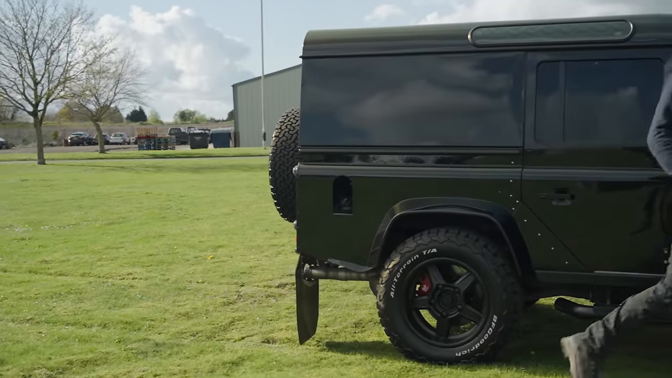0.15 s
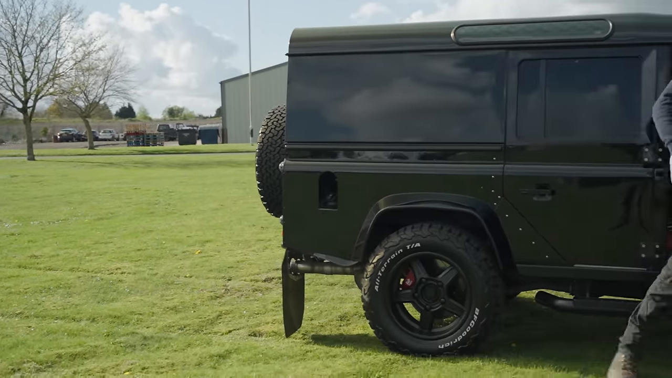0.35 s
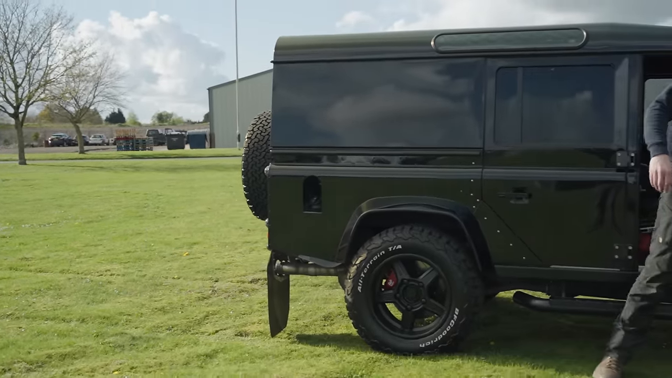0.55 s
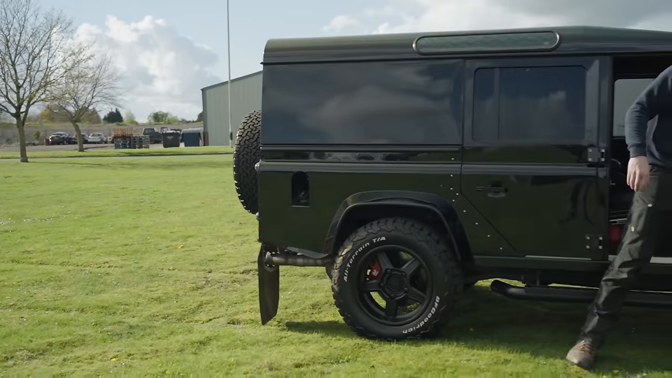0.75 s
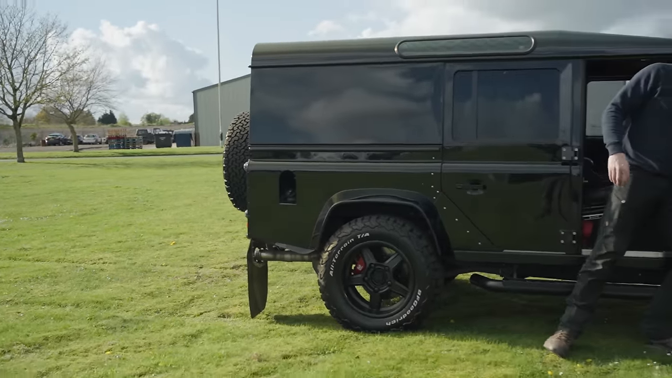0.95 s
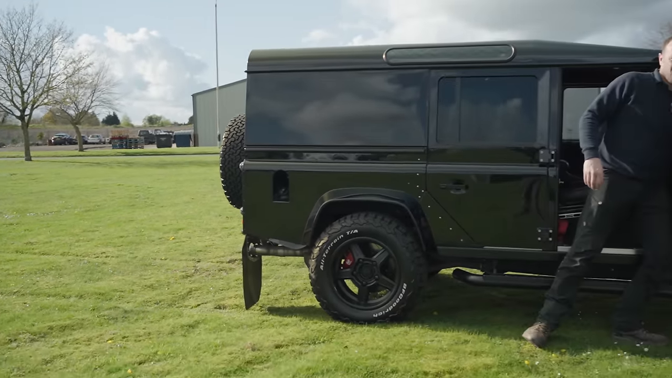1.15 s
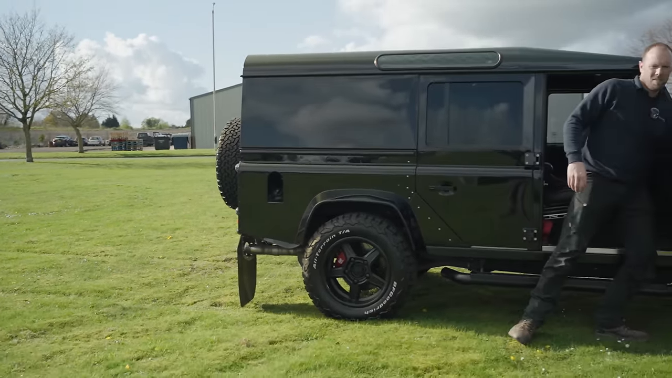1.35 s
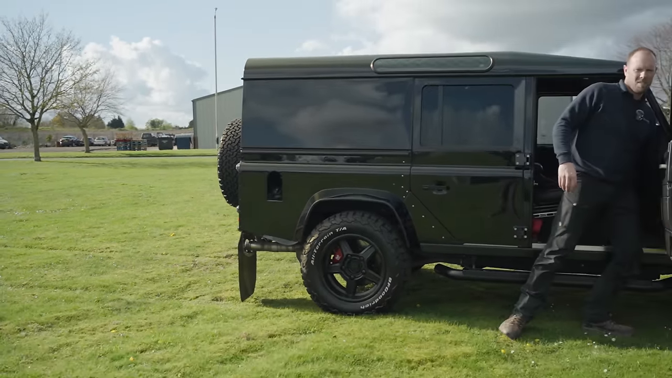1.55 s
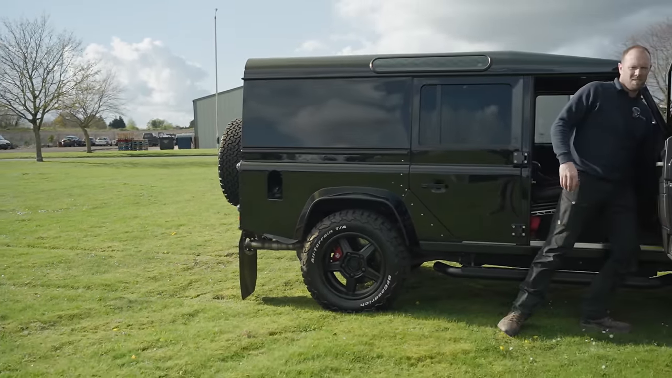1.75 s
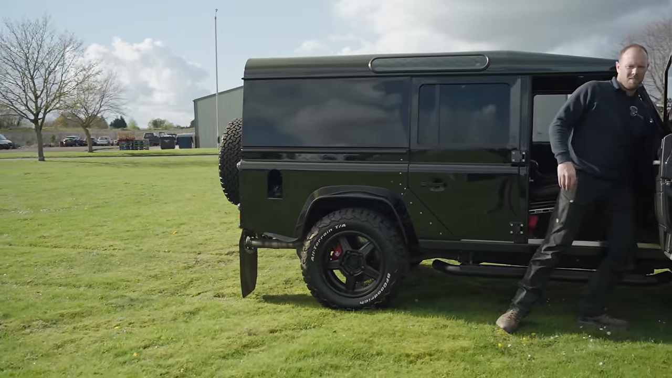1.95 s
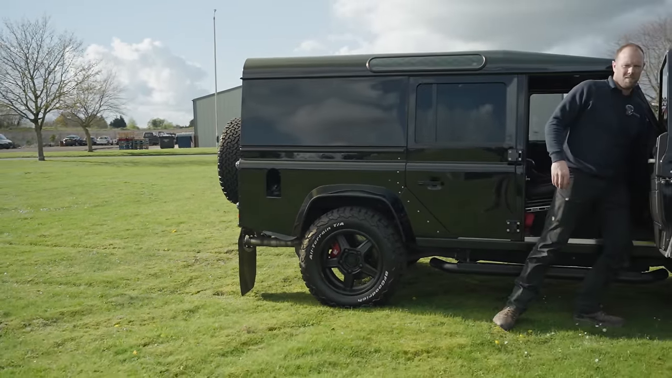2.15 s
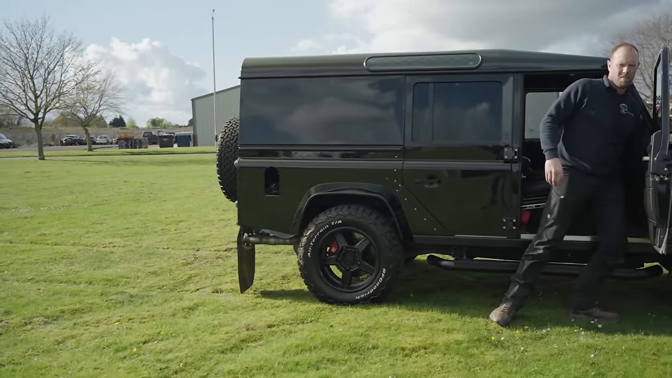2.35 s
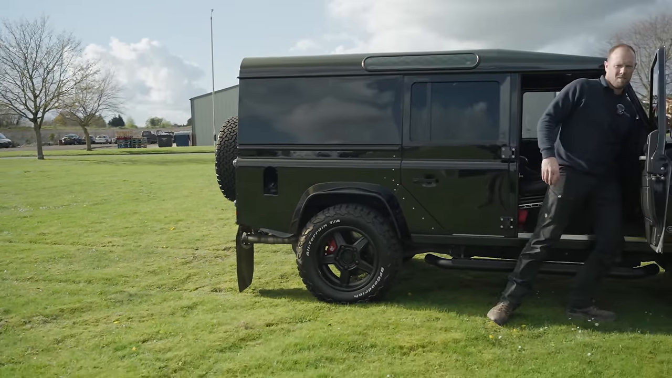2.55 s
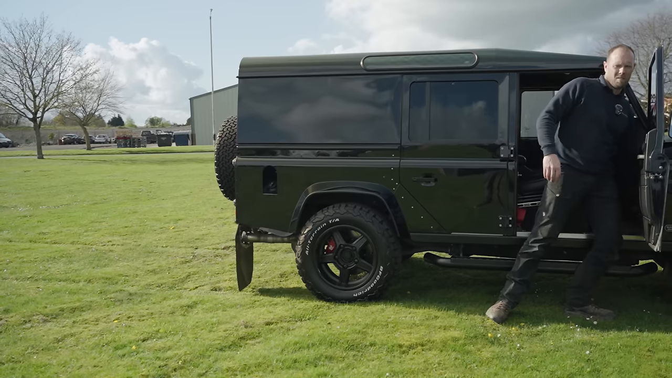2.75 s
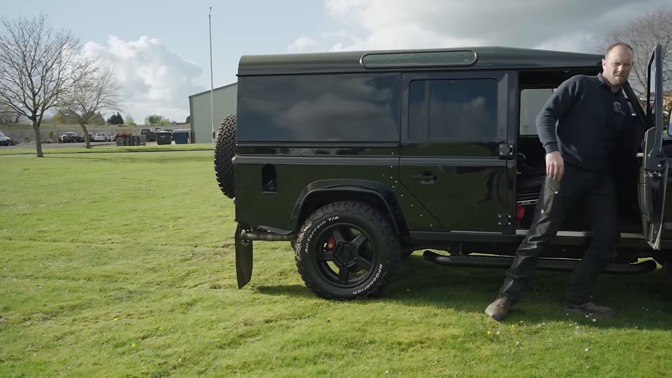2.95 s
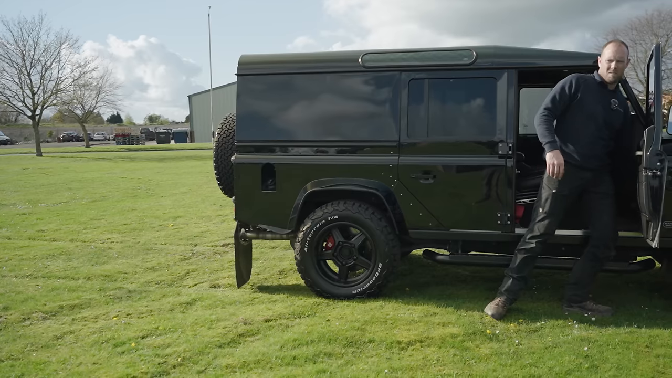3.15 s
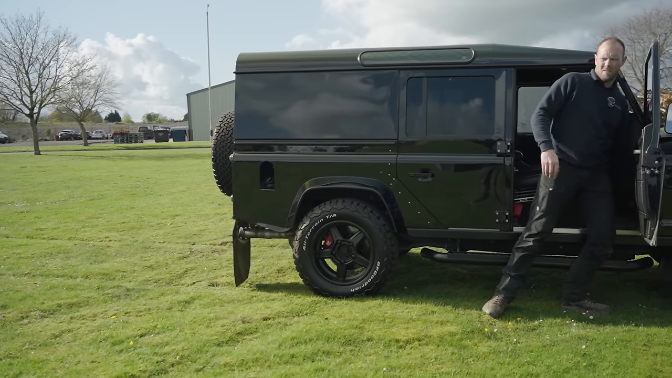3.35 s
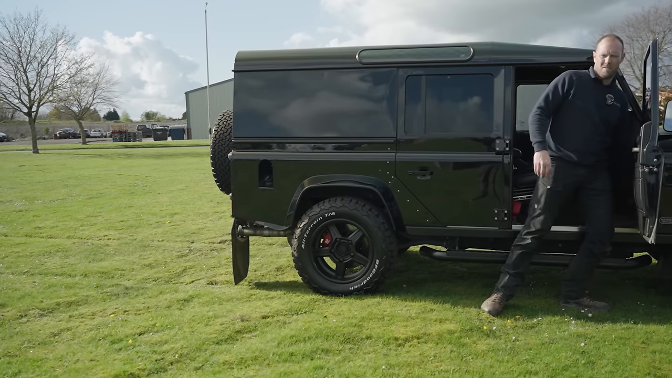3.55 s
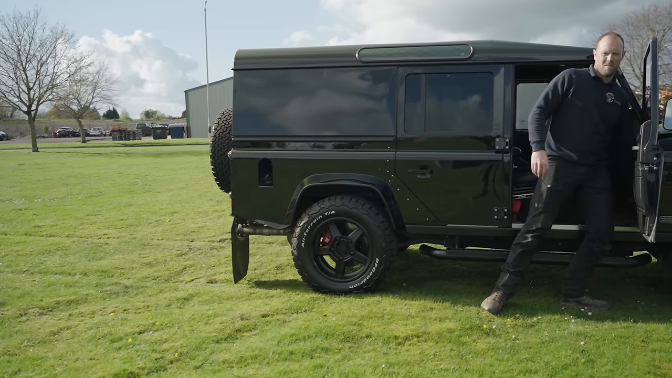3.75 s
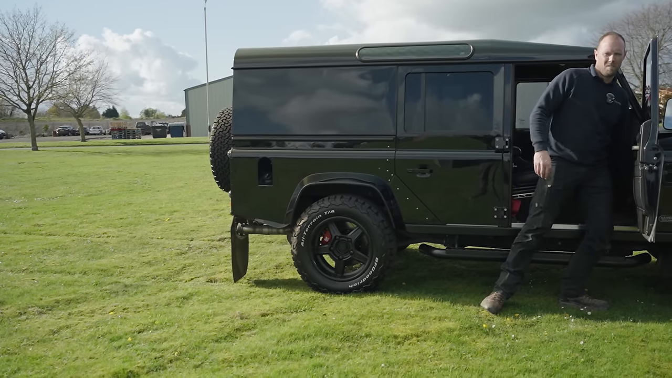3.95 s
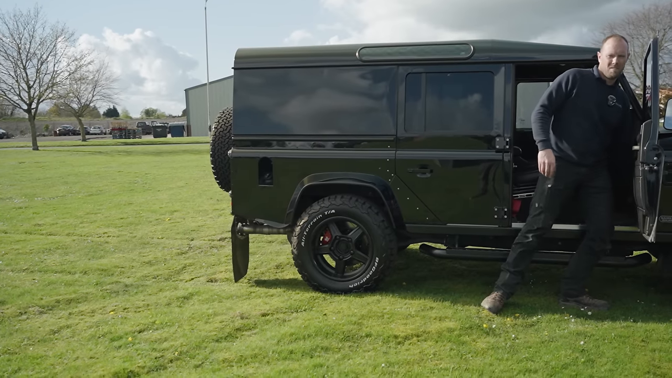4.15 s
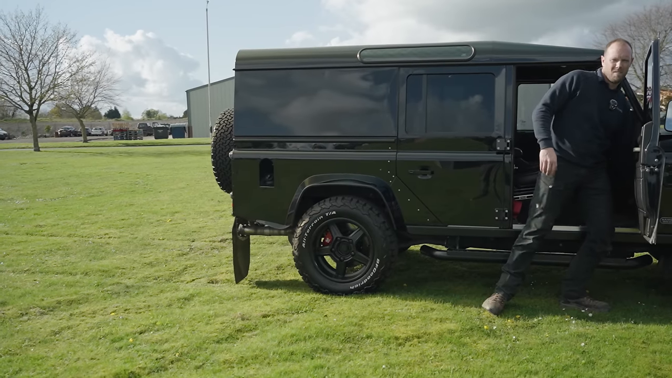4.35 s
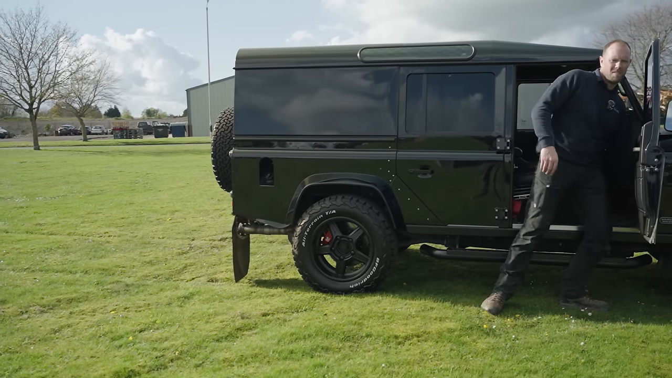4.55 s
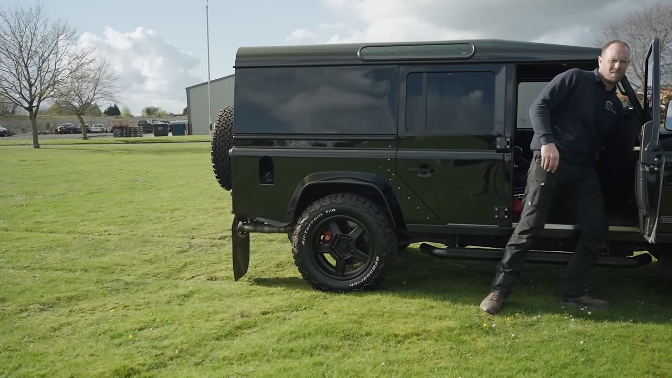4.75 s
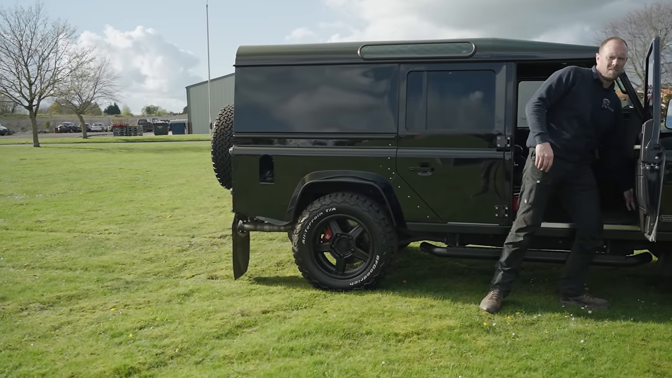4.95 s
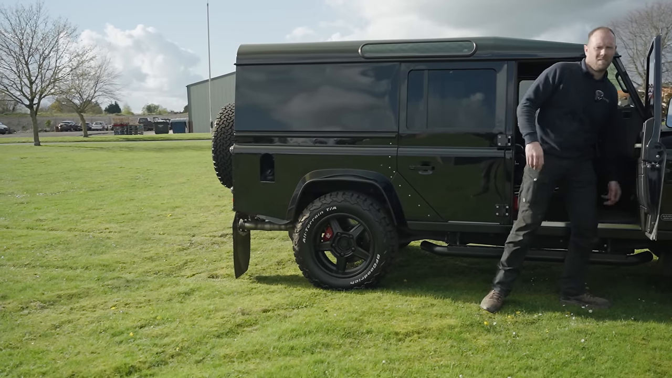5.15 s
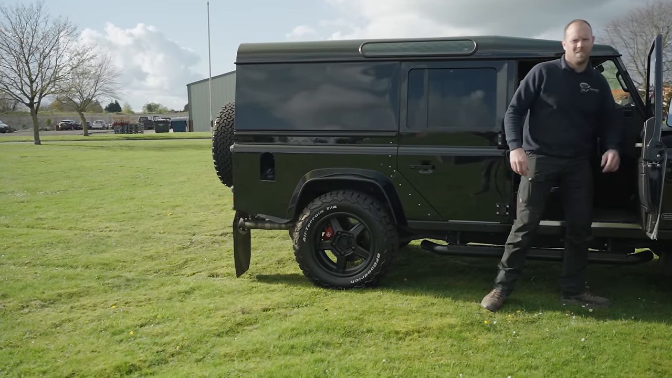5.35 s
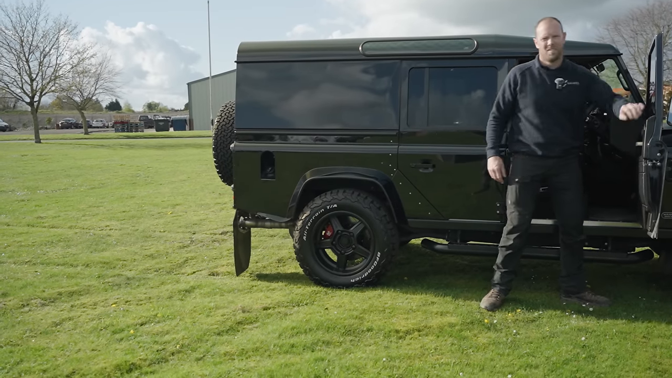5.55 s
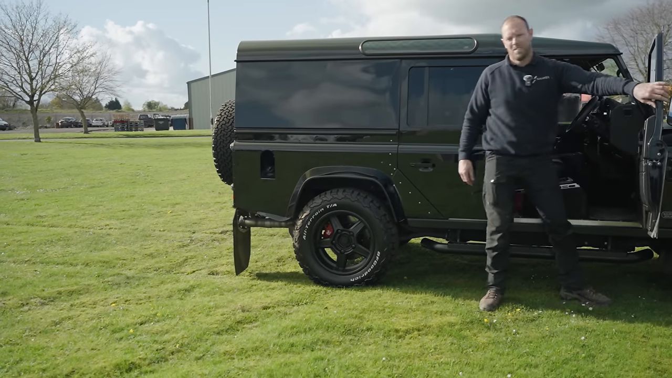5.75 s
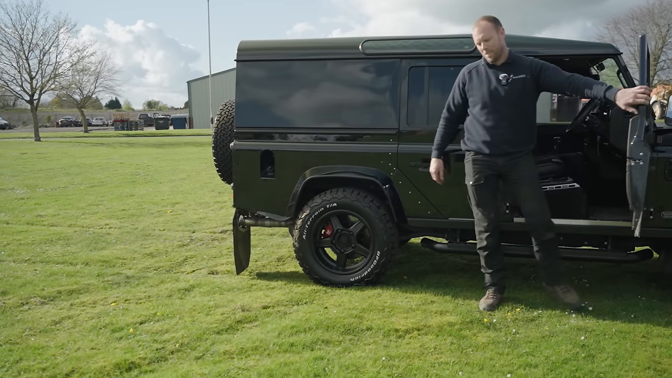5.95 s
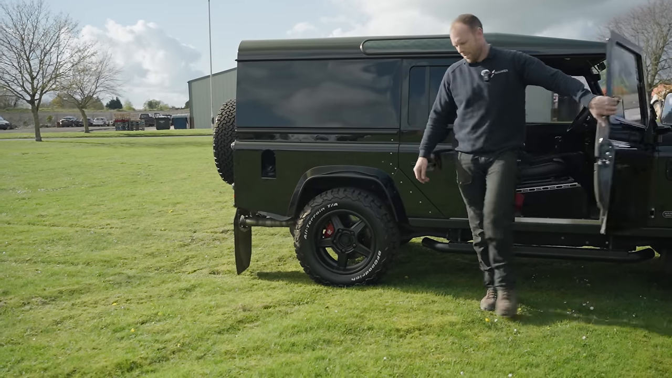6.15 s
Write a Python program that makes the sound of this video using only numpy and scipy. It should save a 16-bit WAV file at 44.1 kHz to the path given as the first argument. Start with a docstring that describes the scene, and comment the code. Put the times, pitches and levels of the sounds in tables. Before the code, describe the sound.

A big V8 idles with a lumpy lope on a lawn, then is revved three times, each harder, the last distorting and crackling.

```python
"""On a lawn a big V8 off-roader idles with a lope and is revved three times, each time harder. Uneven firing
pulses excite the standing waves of the exhaust, and engine orders sweep through them. Pulsed noise makes the
intake and gas jet hiss; a wave repeated each cycle makes the valve gear whirr. Struck resonances burble on the
overrun and sharp cracks ring out at the loudest peaks; a faint duct tone, ticks and air lie beneath, and the
last rev overloads the microphone, which clips the loudest peaks."""
import sys
import numpy as np
from scipy import signal
from scipy.fft import rfft, irfft, next_fast_len
from scipy.io import wavfile
from scipy.ndimage import uniform_filter1d

SR = 44100
rng = np.random.default_rng(int(sys.argv[2]) if len(sys.argv) > 2 else 0)


def digitize_waveform(pressure):
    """Quantize a signal to 16-bit integers and store it at the path in sys.argv[1].

    Rows of a 2-D input are taken as channels; values are limited to [-1, 1].
    """
    field = np.atleast_2d(pressure).T
    bounded = np.clip(field, -1, 1)
    quanta = np.round(bounded * 32767).astype(np.int16)
    wavfile.write(sys.argv[1], SR, quanta)


N = 273800
TIME_S = np.arange(N) / SR

# Leading engine orders, in multiples of the four-stroke cycle rate: 8 is the firing rate,
# and the uneven banks add most others.
LEADING_ORDERS = (2, 3, 4, 5, 6, 7, 8, 9, 10, 11, 13, 16)
# Cylinders in firing order. Each entry: pulse strength in dB.
CYLINDERS = [-5.5, 0.5, -1, -3.5, -3, -3, -18, -1]
# Silencer and tailpipe modes. Each row: frequency in Hz, width in Hz, gain in dB.
BARK_MODES = [(340, 100, -2.5), (431.6, 25.4, 9.5), (496.7, 38.8, 7.5), (545.5, 50.7, 5.5), (582, 21, 6),
              (635, 88, 0), (754.5, 49, -9), (744, 33, -10.5), (1130, 220, -20)]


def from_db(db):
    """Amplitude gain from a level: 20 dB is a factor of ten."""
    return 10 ** (np.asarray(db) / 20)


def rms_one(x):
    """Normalise the mean power to 1."""
    return x / np.sqrt(np.mean(x ** 2) + 1e-20)


def drift(rate):
    """Slow random modulation: normal values of spread 1, rate per second, joined by straight lines."""
    return np.interp(TIME_S * min(rate, 300), np.arange(2048), rng.standard_normal(2048))


def evened(x, span):
    """Automatic gain: hold the rms near 1 over about span seconds, while faster throbs stay."""
    size = max(int(span * SR), 8)
    power = uniform_filter1d(uniform_filter1d(x * x, size), size)
    return x / np.sqrt(np.maximum(power, 1e-20))


def cut(x, hz, kind, order):
    """Butterworth low- or high-pass: maximally flat passband."""
    return signal.sosfilt(signal.butter(order, min(hz, .45 * SR), kind, fs=SR, output="sos"), x)


def coloured(x, spectrum):
    """Spectral shaping: weight a sound by a smooth curve of Hz and dB, then set its rms to 1."""
    hz, db = np.transpose(spectrum)
    size = next_fast_len(N + SR // 2)
    bins = np.maximum(np.arange(size // 2 + 1) * SR / size, 1)
    skirt = np.minimum(bins / hz[0], 1) ** 4   # falls away below the first frequency
    weight = skirt * from_db(np.interp(np.log(bins), np.log(hz), db))
    return rms_one(irfft(rfft(x, size) * weight, size)[:N])


def resonate(x, modes):
    """Modal sum: parallel two-pole resonances of alternating sign, as along a pipe."""
    out = 0
    for k, (hz, width, db) in enumerate(modes):
        r = np.exp(-np.pi * width / SR)
        poles = [1, -2 * r * np.cos(2 * np.pi * hz / SR), r * r]
        gain = (-1) ** k * from_db(db) * (1 - r * r) / 2
        out = out + gain * signal.lfilter([1, 0, -1], poles, x + 1e-18)
    return out


def each_cycle(orders, turn, size=8192):
    """Fourier synthesis: repeat the wave with these complex orders once per engine cycle."""
    return np.interp(turn % 1 * size, np.arange(size), irfft(orders, size)) * size


def load(lead_s=0):
    """Throttle load: each blip ramps up linearly, is held and dies away exponentially."""
    # Each row: opening in seconds, time to the start of decay in seconds, load from 0 to 1,
    # attack in seconds, release time constant in seconds.
    blips = [(1.38, .31, .74, .22, .17), (2.6, .48, .87, .36, .1), (4.5, .51, 1, .31, .06)]
    t = TIME_S + lead_s
    return sum(depth * np.clip((t - s) / attack, 0, 1) * np.exp(-np.maximum(t - s - held, 0) / release)
               for s, held, depth, attack, release in blips)


def swells(rows):
    """Level modulation: Gaussian bumps in dB, one curve for each level column."""
    return sum(np.outer(db, np.exp(-((TIME_S - s) / width) ** 2)) for s, width, *db in rows)


def at_speed(rate):
    """Speed dependence: coasting levels in dB, interpolated along the logarithm of engine speed."""
    # Levels with the throttle shut. Each row: speed in cycles per second, then boom, bark,
    # valve whirr, intake hiss and gas jet, each in dB.
    coasting = [(5.95, -38, -75, -81, -80, -84.5), (13.5, -38.5, -57, -70.5, -78.5, -87),
                (28.2, -32.5, -42.5, -57, -66.5, -75), (36.4, -33, -42, -53, -66, -74.5),
                (41.36, -43.5, -33, -48.5, -60.5, -69.5), (46.8, -30.5, -34.5, -44.5, -56.5, -63)]
    rates, *columns = np.transpose(coasting)
    return [np.interp(np.log(rate), np.log(rates), c) for c in columns]


def scatter(turn):
    """Cyclic variation of combustion: a random surplus or lack at each firing."""
    fired = np.diff(np.floor(turn * len(CYLINDERS)), prepend=0) > 0
    return fired * rng.standard_normal(N)


def puffs(turn, depth):
    """Pulsed turbulence: noise whose level swings by depth dB either way with every firing."""
    return rng.standard_normal(N) * from_db(depth * np.cos(2 * np.pi * len(CYLINDERS) * turn))


def background_air():
    """Steady broadband noise, strongest in the bass."""
    # Noise spectrum. Each row: frequency in Hz, relative level in dB.
    air_colour = [(50, 2), (150, -4), (500, -5), (1000, -19.5), (3000, -42), (8000, -48), (16000, -57.5)]
    return from_db(-57.5) * coloured(rng.standard_normal(N), air_colour)


def ticks():
    """Noise bursts with exponential decay: short dry rustles that die at once."""
    # Footfalls and clothing ticks beside the door. Each row: start in seconds, level in dB
    # before the common cut, time to decay by 60 dB in seconds, high-pass frequency in Hz.
    rustles = [(0.232, -44, 0.015, 4600), (.405, -51.5, 0.14, 3200), (0.507, -47, 0.04, 3300),
               (0.902, -47, 0.046, 810)]
    # Rustle spectrum. Each row: frequency in Hz, relative level in dB.
    tick_colour = [(400, 6), (1300, 23), (2800, 21), (4200, 13), (7000, 5), (14000, -20)]
    out = np.zeros(N)
    noise = coloured(rng.standard_normal(N), tick_colour)
    for s, db, t60, low_hz in rustles:
        decay_db = 60 * np.clip((TIME_S - s) / t60, 0, 2)
        out += (TIME_S >= s) * from_db(db - decay_db) * cut(noise, low_hz, "high", order=3)
    return from_db(-10.5) * out


def howl(rate):
    """Flow-excited resonance: moving air sings faintly in one fixed duct mode, louder with speed."""
    song = resonate(rng.standard_normal(N), [(822.4, 16, 0)])   # Hz, width Hz, dB
    song = cut(cut(song, 700, "high", order=3), 950, "low", order=3)
    return from_db(np.interp(rate, [6, 13, 30, 50], [-72.0, -65.0, -54.0, -50.5])) * rms_one(song)


def whines(turn, rate):
    """Order-locked overtones of the running gear surface and sink at random as the revs fall."""
    # Each row: multiple of the cycle rate, level against the whirr in dB before a 2 dB cut.
    overtones = [(24, -16), (25, -17), (32, -20), (36, -15), (48, -14), (56, -18), (72, -15), (76, -19)]
    tones = 0
    for k, db in overtones:
        level_db = db - 2 + 6 * np.minimum(drift(14), 1) + 2 * drift(60)
        phase = k * turn + rng.random() + .08 * drift(50)   # in turns, slightly unsteady
        tones = tones + from_db(level_db) * np.sin(2 * np.pi * phase)
    fast = np.interp(rate, [22, 44], [0, 1])   # lost at low speed
    return np.sqrt(2) * fast * np.clip(1 - load(), 0, 1) * tones


def engine_bay(turn, rate, count=380):
    """Periodic impacts and pulsed flow noise: valve gear whirrs, intake and gas jet hiss in puffs."""
    # Spectra of the whirr, intake hiss and gas jet. Each row: frequency in Hz, relative level in dB.
    whirr_colour = [(800, 3.5), (1000, -6), (1200, -2), (1600, -4.5), (2000, -7), (2800, -10.5),
                    (3700, -10), (4400, -21), (8000, -34.5), (16000, -53)]
    intake_colour = [(1500, -33.5), (2050, -12.5), (2280, -3.5), (2500, -2.5), (2900, 0), (3150, -4),
                     (3500, -9.5), (4500, -36.5)]
    jet_colour = [(2500, -25.5), (4200, 0), (6500, -0.5), (9000, -10.5), (12000, -27), (16000, -22)]
    # The intake hiss swells (+) and slackens (-) during the blips.
    # Each row: centre in seconds, half width in seconds, level change in dB.
    gulps = [(1.43, 0.046, -1.5), (1.61, 0.028, 2.5), (1.72, 0.098, -6), (2.72, 0.074, -2),
             (2.905, 0.057, 8), (2.97, 0.034, -6.5), (3.055, 0.02, 5.5), (4.55, .04, 3.5), (4.67, 0.078, 3),
             (4.97, 0.047, 1)]
    whirr_load_db, intake_load_db, jet_load_db = 8.5, 19.5, 14.5   # added by full load
    intake_load = load(lead_s=0.055)   # the intake draws air before the exhaust answers

    whirr_db, intake_db, jet_db = at_speed(rate)[2:]
    whirr_db = whirr_db + whirr_load_db * load() * rate / rate.max()   # load times speed
    intake_db = intake_db + intake_load_db * intake_load + swells(gulps)[0]
    jet_db = jet_db + jet_load_db * load()

    strengths = from_db(6 * np.clip(rng.standard_normal(count), -2, 2))
    valves = each_cycle(strengths * np.exp(2j * np.pi * rng.random(count)), turn)
    noise = coloured(rng.standard_normal(N), whirr_colour)
    whirr = .62 * coloured(valves, whirr_colour) + .8 * noise

    depth_db = np.interp(rate, [6, 25], [.6, 2.5])   # the flow is smooth at idle
    intake_flutter = from_db(2 * np.clip(intake_load, 0, 1) * drift(200))
    intake = coloured(puffs(turn, depth_db), intake_colour) * intake_flutter
    jet = coloured(puffs(turn, depth_db), jet_colour) * from_db(0.53 * drift(51))
    return (from_db(whirr_db) * (whirr + whines(turn, rate))
            + from_db(intake_db) * intake + from_db(jet_db) * jet)


def burbles():
    """Impulse response of the pipe: unburnt fuel goes off, barks, and the main standing wave rings."""
    # Each row: start in seconds, peak level in dB.
    bursts = [(3.364, -14.5), (3.378, -15.5), (5.131, -4), (5.148, -5), (5.266, -24), (5.700, -29),
              (6.126, -26)]
    kick = signal.unit_impulse(SR)
    pop = resonate(kick, BARK_MODES) + resonate(kick, [(141.0, 2.27, 28.5)])   # Hz, width Hz, dB
    pop = cut(cut(pop, 760, "low", order=5), 96, "high", order=4)
    pop = pop / np.abs(pop).max()
    out = np.zeros(N)
    for s, db in bursts:
        at = int(s * SR)
        out[at:at + len(pop)] += (from_db(db) * pop)[:N - at]
    return out


def cracks(turn, rate):
    """Steep pressure pulses ring very briefly; near top speed under load every firing adds a rasp."""
    # Sharp cracks at the loudest peaks of the last rev. Each row: start in seconds, peak level in dB before the
    # common gain.
    loud_peaks = [(4.877, -29), (4.892, -29), (4.9214, -37), (4.928, -27), (4.9555, -19), (4.9725, -19),
                  (4.980, -18), (5.001, -20), (5.0083, -17), (5.0153, -30), (5.0186, -20),
                  (5.1329, -23.5), (5.143, -31.5), (5.1528, -23)]
    # Ring of a crack. Each row: frequency in Hz, width in Hz, gain in dB.
    crack_modes = [(500, 250, 10), (2100, 3000, -3.5)]
    gain_db, rasp_db = 2.5, -28
    crack = cut(resonate(signal.unit_impulse(SR // 20), crack_modes), 4200, "low", order=1)
    force = np.clip(load(), 0, 1) ** 2 * np.interp(rate, [36, 50], [0, 1])
    kicks = np.abs(scatter(turn)) * force * from_db(rasp_db)
    for s, db in loud_peaks:
        kicks[int(s * SR)] = from_db(db + gain_db)
    return signal.fftconvolve(kicks, crack / np.abs(crack).max())[:N]


def firing(turn, rate, count=150):
    """Fourier series of two uneven banks, the right one delayed; leading orders are left to drone()."""
    # Places of the left bank's cylinders in the firing order, counted from 0.
    left_bank = (0, 3, 5, 6)
    crossover_s, right_bank_db = 0.00065, -8.5   # the right bank's longer way to the tailpipe
    lazy_cylinder = 2   # place in the firing order
    slots = np.arange(len(CYLINDERS))
    delays = np.exp(-2j * np.pi * np.outer(np.arange(count), slots / len(slots)))
    orders = delays * from_db(CYLINDERS)
    orders[[0, *LEADING_ORDERS]] = 0
    left = np.isin(slots, left_bank)

    uneven = np.clip(np.interp(rate, [6, 14], [.35, 1]), 0, 1)   # the banks are better matched at idle
    late = turn - crossover_s * rate * uneven
    # taking away one cylinder's pulse at idle gives the lope
    lope = np.interp(rate, [6.2, 10], [1.1, 0]) * each_cycle(orders[:, lazy_cylinder], late)
    near = each_cycle(orders @ left, turn)
    far = each_cycle(orders @ ~left, late) - lope
    return (near + from_db(right_bank_db * uneven) * far) * rate / SR


def drone(turn, rate, effort, surge_db, waver_db):
    """Additive synthesis of the leading orders, which grow with speed and load and flutter under load."""
    # Strength of each leading order, lowest first. Each row: coasting level in dB at the reference
    # speed before the common gain, rise at full load in dB, rise with speed in dB per octave.
    order_levels = [(-23, -1.5, 15), (-8.5, 7, 14.5), (-10, 7, 13.5), (-5.5, 20, 18.5), (-6.5, 2.5, 9.5),
                    (-4.5, 12.5, 26), (6, 17, 11), (-1.5, 15, 22), (-6, 11.5, 11.0), (-5, 21.5, 12),
                    (-4.5, 20.5, 14), (-7.5, 19, 5)]
    gain_db, reference_rate, growl_db = 0.44, 42.4, 3   # dB, cycles per s, dB of flutter at full load
    octaves = np.log2(rate / reference_rate)
    tones = 0
    for k, (db, load_db, speed_db) in zip(LEADING_ORDERS, order_levels):
        level_db = db + speed_db * octaves + load_db * effort + surge_db + waver_db * drift(25)
        level_db = level_db + growl_db * effort * (drift(110) - .5)   # the tones break up into a growl
        tones = tones + from_db(level_db) * np.sin(2 * np.pi * (k * turn + rng.random()))
    return np.sqrt(2) * from_db(gain_db) * tones


def standing_waves(x):
    """Minimum-phase filter from the cepstrum: each peak builds up and rings on after a tone has left."""
    # Peaks and dips of the pipe before heating. Each row: frequency in Hz, gain in dB.
    pipe_response = [(25, -55.5), (47, -29.5), (58, -31.5), (77, -22), (86, -32), (95, -31), (112, -33.5),
                     (128, -34), (139, -13.5), (153, -36), (170, -27.5), (189, -39.5), (206, -26.5),
                     (224, -36), (243, -30.5), (268, -28), (294, -45), (327, -36.5), (348, -37.5),
                     (382, -51), (422, -37.5), (460, -45.5), (510, -41), (600, -46.5), (850, -45)]
    hz, db = np.transpose(sorted(pipe_response))
    size = 2 * next_fast_len(len(x) // 2 + SR // 2)
    bins = np.maximum(np.arange(size // 2 + 1) * SR / size, 1)
    gain = from_db(np.interp(np.log(bins), np.log(hz), db))
    cepstrum = irfft(np.log(gain))[:size // 2]
    cepstrum[1:] *= 2   # folding makes the filter causal
    return irfft(rfft(x, size) * np.exp(rfft(cepstrum, size)))[:len(x)]


def hot_pipe(x, stretch, pipe):
    """Sound travels faster in hot gas: the pipe rings on a faster clock, which lifts its pitch."""
    clock = np.cumsum(np.clip(stretch, .5, 2))
    steps = np.arange(int(clock[-1]) + 1)
    return np.interp(clock, steps, pipe(np.interp(steps, clock, x)))


def silencer_delay(x):
    """Pure propagation delay: a linear phase shift holds sound back by the sum of the chamber times."""
    # Round trips in the silencer's chambers. Each entry: time in seconds.
    chamber_times = (0.003633, 0.005194, .0083)
    size = next_fast_len(N + SR // 2)
    hz = np.arange(size // 2 + 1) * SR / size
    return irfft(rfft(x, size) * np.exp(-2j * np.pi * hz * sum(chamber_times)), size)[:N]


def exhaust(turn, rate):
    """Source and resonator: pulses boom in the long pipe and bark in the silencer, orders drone."""
    # Low standing waves of the exhaust. Each row: frequency in Hz, width in Hz, gain in dB.
    boom_modes = [(76.8, 14, 5), (102, 35, -6.5), (136.4, 9.9, 8), (170.7, 4.8, -2.5), (190.2, 9.7, -9),
                  (246.5, 9.56, 7.5), (323.1, 19.5, -3)]
    # Combustion catches (+) or falters (-) for a moment. Each row: centre in seconds,
    # half width in seconds, then changes of boom, bark and leading orders, each in dB.
    surges = [(1.295, 0.11, -4, 6, -8), (1.45, 0.023, -6.5, 0.5, 5.5), (1.53, 0.035, -1, -1.5, 4.5),
              (1.59, 0.022, -4.5, 0.5, -0.5), (1.72, 0.044, 4, 2, 3.5), (1.86, 0.064, 7.5, 7, 7),
              (2.0, .08, 2, 1.5, -1.5), (2.89, .05, -0.5, -3, 2.5), (2.98, 0.05, 5, 0, -1.5),
              (3.08, 0.032, 6, 0.5, 1), (3.272, 0.025, 2.5, 2.5, -9), (3.37, 0.055, 14, 4, 5.5),
              (3.43, 0.034, -7.5, -1.5, 6), (3.521, 0.047, -4, 2, 10), (4.25, 0.17, -2.5, 2.5, 4.5),
              (5.13, 0.092, 13, 4, 9.5), (5.289, 0.044, 18.5, 4.5, 11.5), (5.39, 0.03, 0, -4.5, -4),
              (5.49, 0.08, 1, -5.5, 6), (5.61, 0.054, -3, -2, -8), (5.719, 0.053, 11.5, 3, 7),
              (6.169, 0.049, -1.5, -12, 6)]
    boom_load_db, bark_load_db, top_end_db = 15, 19, 3   # added by full load, the last near top speed
    heat_by_load, heat_by_speed, reference_rate = 0.037, 0.0017, 7.9   # share, share per cycle/s, cycles/s

    effort = load()
    surge_db, bark_surge_db, tone_surge_db = swells(surges)
    boom_db, bark_db = at_speed(rate)[:2]
    boom_db = boom_db + boom_load_db * effort + surge_db
    bark_db = bark_db + bark_load_db * effort + bark_surge_db
    stretch = 1 + heat_by_load * effort + heat_by_speed * (rate - reference_rate)

    tones = hot_pipe(drone(turn, rate, effort, tone_surge_db, waver_db=2), stretch, standing_waves)

    pulses = firing(turn, rate)
    rough = np.interp(rate, [6, 14, 45], [.16, .24, .14])
    boom = hot_pipe(pulses + rough * scatter(turn), stretch, lambda gas: resonate(gas, boom_modes))
    boom = cut(boom, 60, "high", order=7)
    # pulses are round at idle and grow sharper with speed
    sharp = np.clip(np.interp(rate, [6, 14, 35], [.05, .5, .9]), 0, 1)
    round_boom = coloured(boom, [(30, 0.5), (255, 1.5), (320, -8.0), (600, -25.5)])
    sharp_boom = coloured(boom, [(30, -17), (85, -12.5), (140, -7.0), (350, 1.0), (450, -5.0), (800, -25.5)])
    boom = evened((1 - sharp) * round_boom + sharp * sharp_boom, span=0.32)

    turbulence = np.interp(rate, [6, 14, 45], [.22, .2, .18]) * np.sqrt(len(CYLINDERS) * rate / SR)
    gas = pulses + rough * scatter(turn) + turbulence * puffs(turn, depth=18.2)
    bark = resonate(silencer_delay(gas), BARK_MODES)
    bark = cut(cut(bark, 310, "high", order=3), 1300, "low", order=4)
    bark = evened(bark, span=.035)

    top_end = from_db(top_end_db * effort * np.interp(rate, [32, 42], [0, 1]))
    return top_end * (tones + from_db(boom_db) * boom + from_db(bark_db) * bark)


def scene():
    """Phase integration: the crank angle drives the engine; its speed hunts, relatively most when slow."""
    # Engine speed before hunting; eight firings make a cycle.
    # Each row: time in seconds, speed in four-stroke cycles per second.
    speed_curve = [(0.0, 5.91), (1.15, 5.9), (1.4, 7.44), (1.5, 8.92), (1.6, 12.05), (1.7, 15.85),
                   (1.95, 13.65), (2.3, 12.45), (2.58, 11.64), (2.8, 16.7), (2.88, 17.89), (2.95, 22.09),
                   (3.03, 27.99), (3.12, 34.1), (3.2, 35.3), (3.4, 32.24), (3.65, 30.46), (3.95, 25.98),
                   (4.25, 23.8), (4.47, 23.98), (4.6, 27.12), (4.7, 31.19), (4.8, 38.28), (4.9, 45.07),
                   (4.96, 51.06), (5.02, 51.38), (5.1, 49.1), (5.3, 42.94), (5.48, 43.57), (5.6, 40.51),
                   (5.9, 36.65), (6.21, 32.0)]
    seconds, cycles = np.transpose(speed_curve)
    speed = np.interp(TIME_S, seconds, cycles)
    rate = speed * (1 + np.interp(speed, [6, 14, 30], [.008, .008, .003]) * drift(22))
    turn = np.cumsum(rate) / SR   # engine cycles completed
    background = background_air() + ticks() + howl(rate)
    engine = engine_bay(turn, rate) + burbles() + cracks(turn, rate) + exhaust(turn, rate)
    return (background + engine)[None]


def record(dry):
    """Saturation and band limiting: the loudest peaks are clipped flat, the top is cut."""
    clipped = np.clip(dry, -1, 1)
    low_pass = signal.ellip(10, .1, 80, 15800, fs=SR, output="sos")   # ripple dB, stop dB, edge Hz
    return signal.sosfilt(low_pass, clipped)


dry = scene()
out = record(dry)
digitize_waveform(out)
```